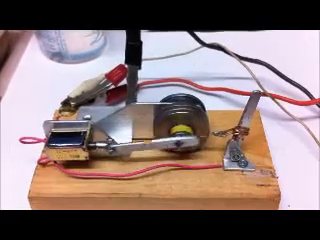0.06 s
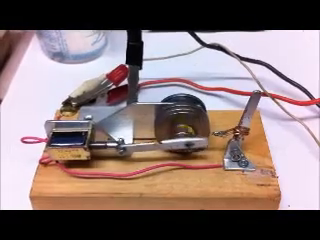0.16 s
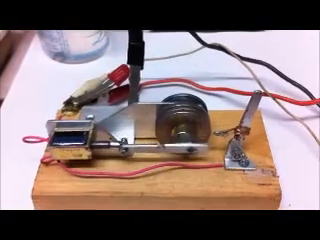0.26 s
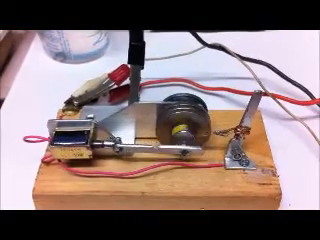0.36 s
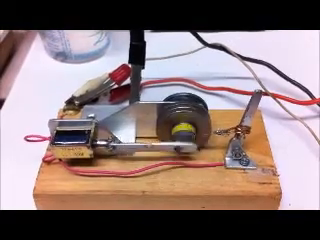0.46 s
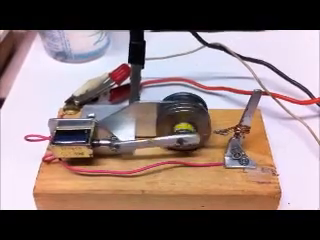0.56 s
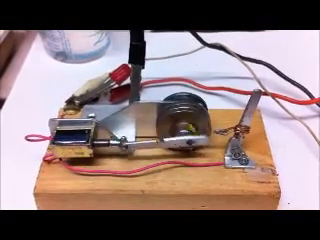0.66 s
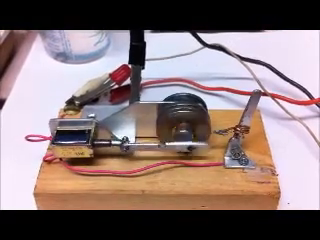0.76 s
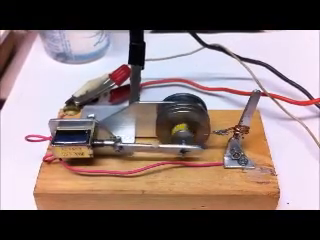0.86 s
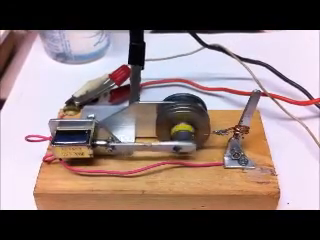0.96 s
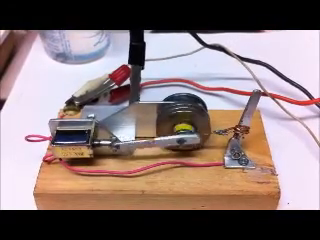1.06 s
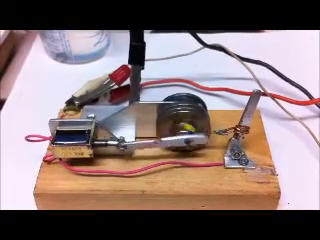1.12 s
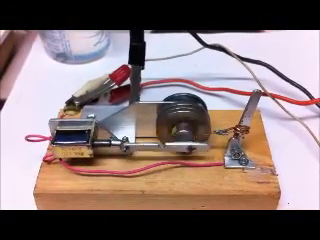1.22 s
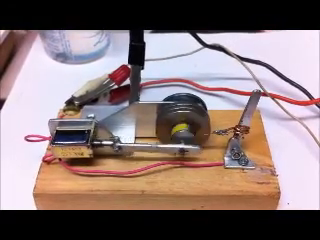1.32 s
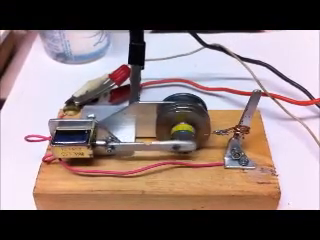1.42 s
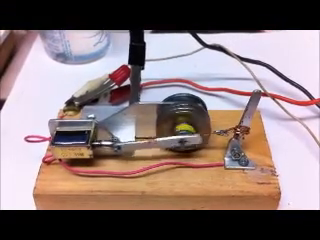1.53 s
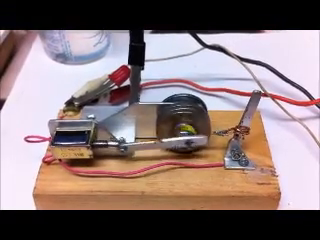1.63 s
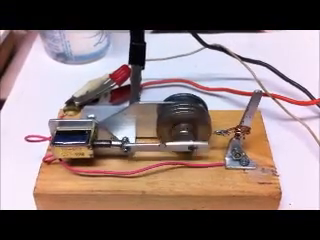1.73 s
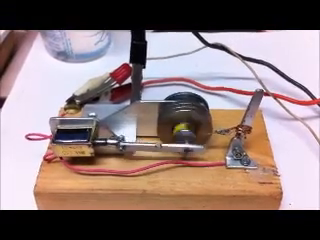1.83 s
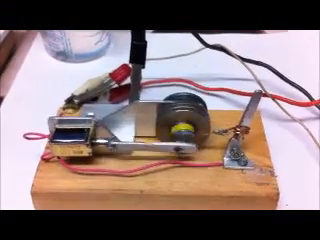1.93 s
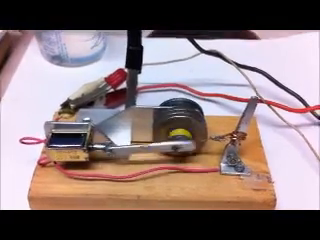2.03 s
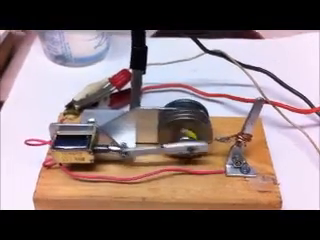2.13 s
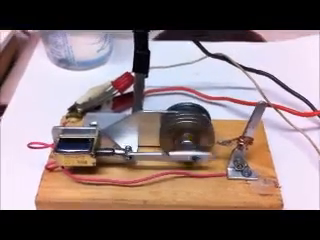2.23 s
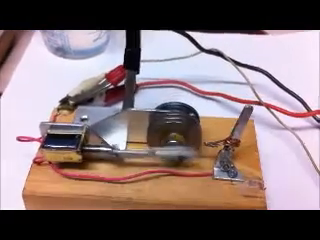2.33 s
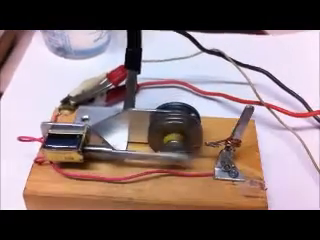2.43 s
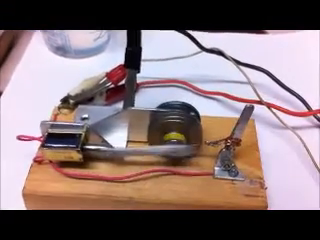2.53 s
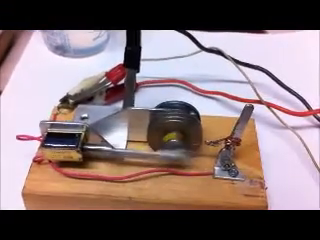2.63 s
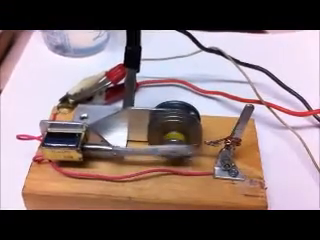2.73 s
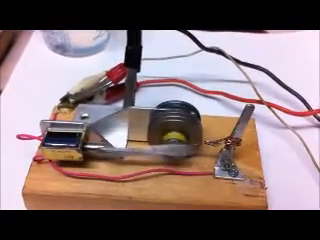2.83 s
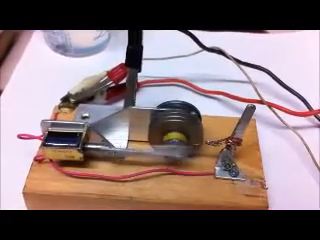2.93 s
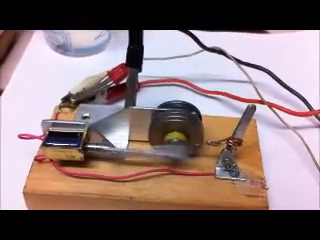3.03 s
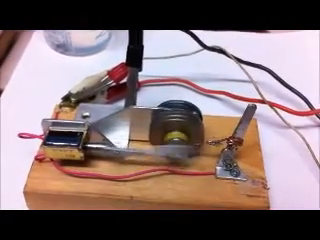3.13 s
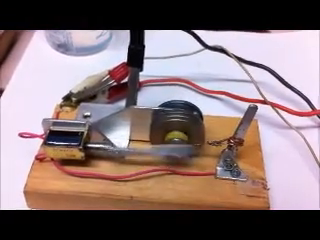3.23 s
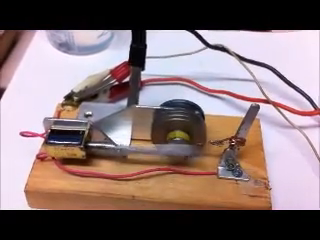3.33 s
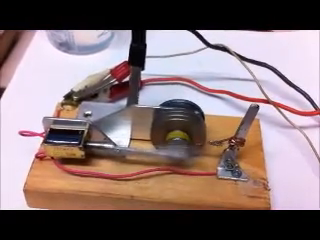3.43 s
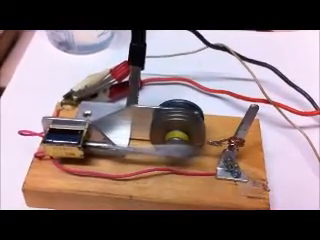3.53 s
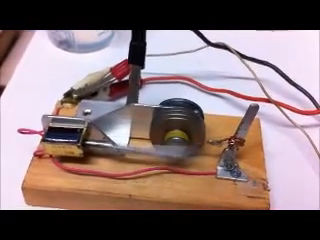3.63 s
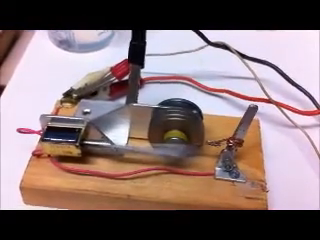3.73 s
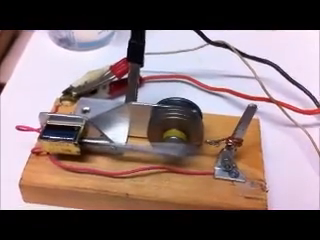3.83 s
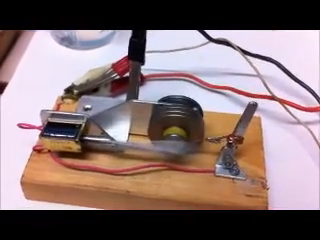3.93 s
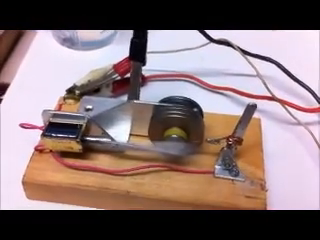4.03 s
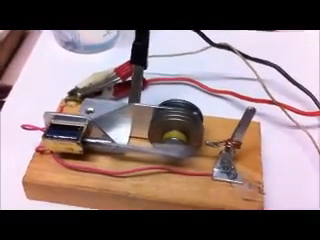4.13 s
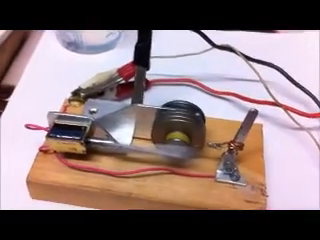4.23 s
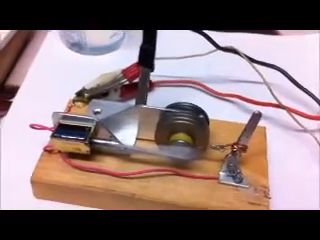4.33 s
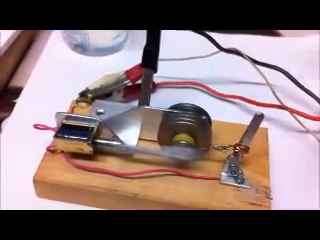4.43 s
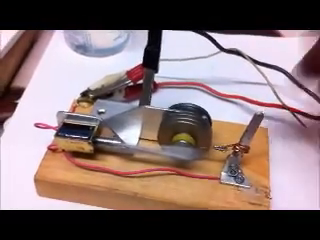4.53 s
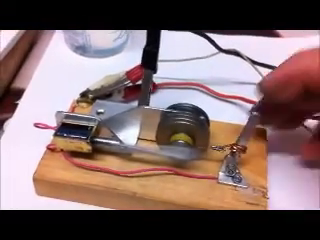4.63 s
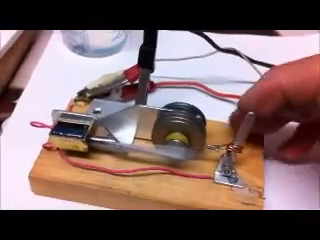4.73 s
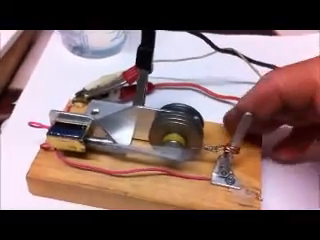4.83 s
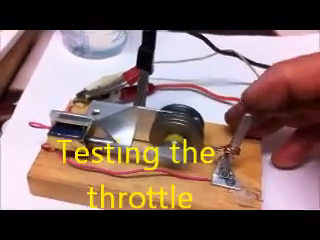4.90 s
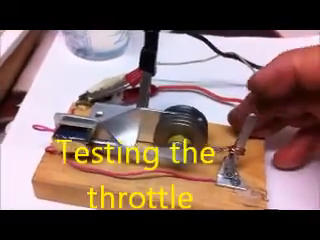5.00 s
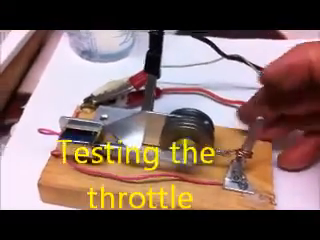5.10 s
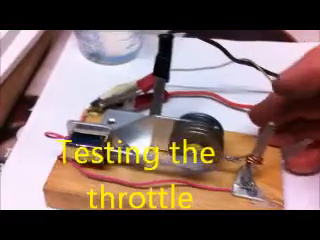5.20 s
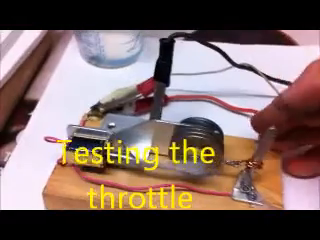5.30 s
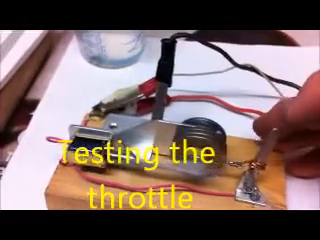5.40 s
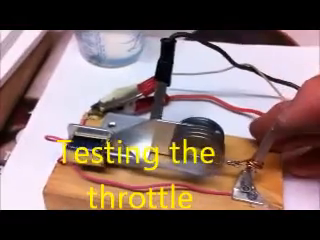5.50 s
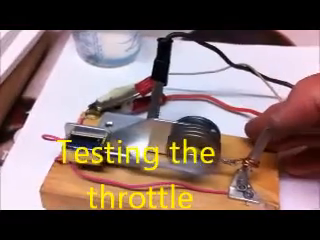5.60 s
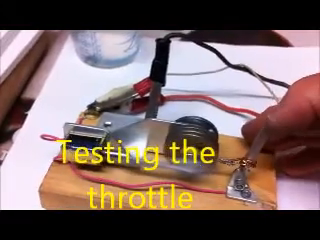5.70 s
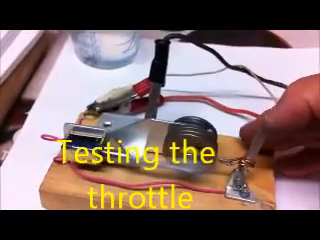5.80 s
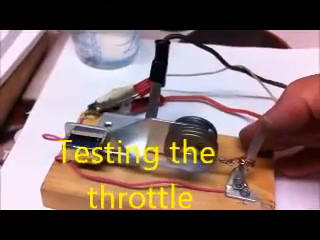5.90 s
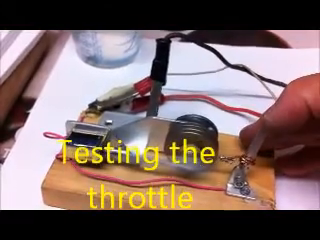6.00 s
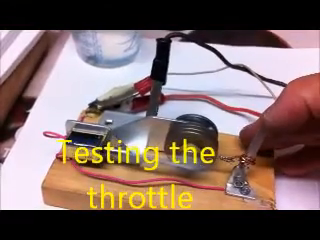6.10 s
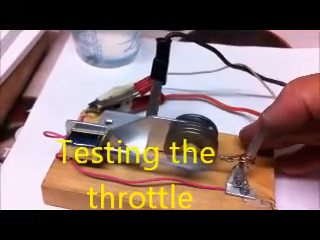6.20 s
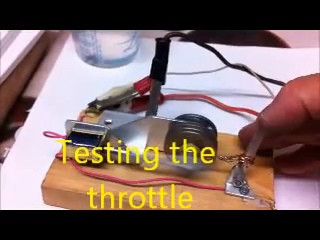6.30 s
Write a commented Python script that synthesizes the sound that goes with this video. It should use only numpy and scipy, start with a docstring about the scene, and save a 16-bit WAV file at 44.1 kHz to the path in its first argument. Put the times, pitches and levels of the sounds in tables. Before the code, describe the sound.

A small solenoid engine runs on a wooden board in a quiet room with faint hiss. For the first 2.3 seconds it sounds as if in slow motion: five sharp, high steel clacks half a second apart, each preceded by a light switch tick, with faint, thin squeaks from rubbing parts. A few soft, dull bumps come close to the microphone around 2.1 to 2.2 seconds. At 2.5 seconds the engine abruptly runs louder and faster, climbing from about twelve clacks a second to about thirty by 4 seconds. A faint high squeal fades by 3 seconds, and the switch ticks end soon after. Two more dull thumps land just before 4 seconds. The bright clatter, uneven in strength, carries on at a steady pace until the end at about 6.4 seconds, over rattling linkage, a friction rustle and a soft, low flywheel hum.

```python
"""A small solenoid engine

A solenoid engine on a wooden base board clacks about twice a second as if in slow motion, then runs at full
pace and speeds up to about 31 clacks a second. Each time the plunger strikes and bounces and the linkage
rattles, exciting the modes of frame and board. Friction adds a rustle and two stick-slip squeals, the flywheel
makes the board hum, the cam switch ticks at first, and a few dull bumps sound close to the microphone."""
import sys
import numpy as np
from scipy import signal
from scipy.fft import rfft, irfft, next_fast_len
from scipy.io import wavfile
from scipy.ndimage import uniform_filter1d

SR = 44100
rng = np.random.default_rng(int(sys.argv[2]) if len(sys.argv) > 2 else 0)


def to_wav(s):
    """Save 16-bit WAV."""
    ch = np.atleast_2d(s).T  # columns
    pcm = np.round(np.clip(ch, -1, 1) * 32767)  # PCM
    wavfile.write(sys.argv[1], SR, pcm.astype(np.int16))


N = 280035
T = np.arange(N) / SR


def amp(db):
    """Amplitude ratio of a level in dB."""
    return 10 ** (np.asarray(db) / 20)


def rms_one(x):
    """Normalisation to rms 1."""
    return x / np.sqrt(np.mean(x ** 2) + 1e-20)


def place(times, shapes):
    """Superposition: each row of shapes starts at its time."""
    out = np.zeros(N + shapes.shape[1])
    starts = np.round(np.clip(times, 0, T[-1]) * SR).astype(int)
    np.add.at(out, starts[:, None] + np.arange(shapes.shape[1]), shapes)
    return out[:N]


def swell(rise_s, fall_s):
    """Exponential growth and decay: an 80 ms envelope of peak 1, and the time of its peak."""
    t = T[:SR * 8 // 100] - 0.02
    shape = np.exp(-np.logaddexp(-t / rise_s, t / fall_s))
    return shape / shape.max(), T[shape.argmax()]


def bursts(times, db, rise_s, fall_s):
    """Transient envelopes that peak at the given times."""
    shape, peak_s = swell(rise_s, fall_s)
    return place(times - peak_s, amp(db)[:, None] * shape)


def pings(times, db, hz, rise_s, fall_s):
    """Damped sinusoids of random phase that peak at the given times."""
    shape, peak_s = swell(rise_s, fall_s)
    phase = rng.uniform(0, 2 * np.pi, (len(times), 1))
    tone = np.sin(2 * np.pi * np.outer(hz, T[:len(shape)]) + phase)
    return place(times - peak_s, amp(db)[:, None] * shape * tone)


def grains(per_s, spread_db):
    """Shot noise: random small contacts of uneven size; rms 1."""
    sizes = amp(spread_db * np.minimum(rng.exponential(1, N), 4)) * rng.choice([-1, 1], N)
    return rms_one(sizes * (rng.random(N) < per_s / SR))


def drift(corner_hz):
    """Slow random fluctuation: low-passed noise; rms 1."""
    r = np.exp(-2 * np.pi * corner_hz / SR)
    return rms_one(signal.lfilter([1], [1, -2 * r, r * r], rng.standard_normal(N + SR))[SR:])


def coloured_noise(spectrum):
    """Spectral shaping of white noise by (f/Hz, level/dB) points; rms 1."""
    hz, db = np.transpose(spectrum)
    size = next_fast_len(N)
    bins = np.maximum(np.fft.rfftfreq(size, 1 / SR), 1)
    gain = amp(np.interp(np.log(bins), np.log(hz), db))
    return rms_one(irfft(rfft(rng.standard_normal(N), size) * gain, size)[:N])


def band(x, low_hz, high_hz, order):
    """Butterworth band-pass; rms 1."""
    sos = signal.butter(order, [low_hz, high_hz], "band", fs=SR, output="sos")
    return rms_one(signal.sosfilt(sos, x))


def resonance(x, hz, width_hz):
    """Two equal two-pole resonators in cascade; rms 1."""
    r = np.exp(-np.pi * width_hz / SR)
    section = [1, 0, -1, 1, -2 * r * np.cos(2 * np.pi * hz / SR), r * r]
    return rms_one(signal.sosfilt([section, section], x))


def body(force, modes):
    """Modal superposition: a force drives damped modes of alternating sign."""
    out = 0
    for k, (hz, db, t60) in enumerate(modes):
        r, w = amp(-60 / (t60 * SR)), 2 * np.pi * hz / SR
        mode = signal.lfilter([0, np.sin(w)], [1, -2 * r * np.cos(w), r * r], force + 1e-18)
        out = out + (-1) ** k * amp(db) * mode
    return out


def shaken(envelope, contacts, modes):
    """Random excitation of modes; an envelope of 1 gives rms 1."""
    return body(envelope * contacts, modes) / np.std(body(contacts, modes))


def steel(contacts):
    """The plunger's broad, heavily damped treble resonance; rms 1."""
    return band(resonance(contacts, 9200, width_hz=8700), 6520, 9950, order=4)


def high_sizzle(noise):
    """Narrow-band noise: a thin, high sizzle near 11.8 kHz; rms 1."""
    return resonance(noise, 11770, width_hz=810)


# Room noise spectrum: f/Hz, relative density level/dB
ROOM_SPECTRUM = [(41, -48), (70, -11), (194, -5.5), (387, -12), (1620, -13.5), (2050, -12), (2340, -5),
                 (2780, -19), (5330, -17), (6760, -13), (12400, -22), (16100, -54), (22000, -120)]


def room():
    """Ambient noise: a faint, stationary hiss."""
    return amp(-66) * coloured_noise(ROOM_SPECTRUM)


# Bumps near the microphone: t/s, level/dB, f/Hz
BUMPS = [(2.101, -33.5, 203), (2.146, -59, 164), (2.173, -48, 174), (2.214, -39, 292.6),
         (2.221, -32, 258.6), (3.876, -24.5, 247.5), (3.976, -31.5, 344)]


def bumps():
    """Heavily damped oscillation: thuds of a cycle or two, with a higher partial as their edge."""
    times, db, hz = np.transpose(BUMPS)
    thuds = pings(times + 0.0035, db, hz, 0.00023, 0.0019)
    edges = pings(times + 0.00163, db - 1, 3.5 * hz, 0.00016, 0.00037)
    return signal.sosfilt(signal.butter(2, 110, "high", fs=SR, output="sos"), thuds + edges)


# Squeaks of the rubbing parts, at a low and a high pitch: t/s, duration/s, level/dB, f/Hz
LOW_SQUEAKS = [(0.04, 0.092, -58, 2323), (0.24, 0.082, -54, 2355), (0.54, 0.042, -58, 2300),
               (0.735, 0.08, -57, 2335), (1.035, 0.051, -62, 2334), (1.24, 0.052, -58, 2390),
               (1.32, 0.052, -54.5, 2320), (1.53, 0.078, -59.5, 2313), (1.8, 0.047, -59.5, 2336),
               (2.05, 0.03, -53.5, 2310), (2.22, 0.053, -62, 2330), (2.31, 0.03, -57, 2306)]
HIGH_SQUEAKS = [(0.0, 0.013, -54, 6800), (0.225, 0.03, -57, 6570), (0.3, 0.068, -57, 6690),
                (0.505, 0.018, -55, 6750), (0.73, 0.04, -59, 6680), (0.81, 0.014, -57.5, 6680),
                (0.855, 0.017, -59, 6780), (1.0, 0.011, -52.5, 6760), (1.225, 0.03, -59, 6550),
                (1.3, 0.08, -60, 6740), (1.47, 0.045, -64.5, 6670), (1.7, 0.06, -59.5, 6700),
                (1.79, 0.016, -61.5, 6730), (1.85, 0.022, -65, 6750), (2.2, 0.05, -61, 6700),
                (2.49, 0.24, -54.5, 6880), (2.8, 0.63, -57, 6660)]


def squeal(squeaks, between_db, until_s, width_hz, flicker_db):
    """Stick-slip oscillation: a faint narrow-band tone swells into squeaks and is gone by until_s."""
    times, length_s, db, hz = np.transpose(squeaks)
    level = np.full(N, amp(between_db))
    for start, stop, peak in zip(times, times + length_s, amp(db)):
        level[round(start * SR):round(stop * SR)] = peak
    level = uniform_filter1d(level, size=400) * amp(flicker_db * drift(17.5))
    r = np.exp(-np.pi * width_hz / SR)
    in_phase, quadrature = signal.lfilter([1], [1, -2 * r, r * r], rng.standard_normal((2, N)))
    phase = 2 * np.pi * np.cumsum(np.interp(T, times + length_s / 2, hz)) / SR
    fade = np.clip((until_s - T) / 0.089, 0, 1)
    return fade * level * rms_one(in_phase * np.cos(phase) + quadrature * np.sin(phase))


def flywheel_hum(level_db):
    """Forced vibration: at full pace the flywheel pushes the board's lowest mode once a turn."""
    clacks = np.transpose(STROKES)[0]
    even_times = uniform_filter1d(clacks, size=5, mode="nearest")[9:]  # inertia evens out the turns
    push = place(even_times + 0.0011, np.ones((len(even_times), 1))) + amp(-38) * rng.standard_normal(N)
    return amp(level_db) * resonance(push, 207.8, width_hz=51)


# Modes of the frame and of the base board: f/Hz, level/dB, T60/s
FRAME_MODES = [(2034, 4, 0.0064), (2148, 0.5, 0.019), (2308, -3.5, 0.019), (2545, -4.5, 0.023),
               (2840, 0, 0.0078), (3460, 1.5, 0.0059), (4170, 0.5, 0.0071), (4750, 0.5, 0.0055),
               (5560, -1, 0.0044)]
BOARD_MODES = [(370, -4, 0.024), (502, -4, 0.023), (654, -2, 0.026), (787, 4.5, 0.015), (976, 5, 0.011),
               (1126, -2, 0.023), (1386, 4, 0.0089)]
# Rumble spectrum of the board: f/Hz, relative density level/dB
RUMBLE_SPECTRUM = [(12, -50), (20, 4), (123, -10), (208, -12), (276, -1), (352, -4), (500, -13),
                   (650, -70), (1100, -120)]
# Base levels that swell and fade: t/s, frame friction/dB, board friction/dB, hum/dB, high sizzle/dB
RUNNING_LEVELS = [(0.0, -72, -79.5, -87, -77), (2.0, -74, -79, -85, -79), (2.3, -65.5, -72.5, -83, -76),
                  (2.475, -64.5, -71, -68, -68), (2.5, -58.5, -53, -66, -59), (2.6, -50.5, -54.5, -56, -65),
                  (2.999, -46.5, -49, -64, -61), (3.33, -44, -46.5, -55, -62),
                  (3.6, -45.5, -46, -60, -57.5), (3.95, -44.5, -48, -56.5, -60.5),
                  (4.45, -38, -43.5, -50, -65.5), (4.6, -38, -44.5, -51, -60),
                  (5.2, -39.5, -45, -49.5, -67), (5.5, -40.5, -46.5, -51, -67),
                  (5.75, -42.5, -49, -46.5, -66), (6.05, -41.5, -42.5, -48, -72.5),
                  (6.35, -42, -48.5, -48.5, -72)]


def running_noise():
    """Frictional excitation: rubbing shakes board, frame and plunger; a hum and a thin sizzle join in."""
    times, *columns = np.transpose(RUNNING_LEVELS)
    rub_db, board_db, hum_db, sizzle_db = [np.interp(T, times, column) for column in columns]
    # each slow-motion clack stirs the rubbing parts, which then calm down
    opening = np.transpose(STROKES)[0][:len(OPENING_TICKS)]
    since_s = np.where(T < opening[0], 1, T - opening[np.searchsorted(opening, T) - 1])
    stir_db, calm_db_per_s = np.c_[[13.1, 4, 7, 25]], np.c_[[89.5, 60.4, 40, 150]]
    stir = np.maximum(stir_db - calm_db_per_s * since_s, 0)
    board_stir, frame_stir, steel_stir, hum_stir = uniform_filter1d(stir, size=900)
    board_db = board_db + board_stir + 1.74 * drift(3.5)
    frame_db = rub_db + frame_stir + 1.8 * drift(10.4)
    steel_db = -45.5 + 1.17 * (rub_db + 43) + steel_stir + 1.4 * drift(9.0)
    hum_db = hum_db + hum_stir + 2.4 * drift(8.1)
    turns = np.interp(T, np.transpose(STROKES)[0], np.arange(len(STROKES)))
    load = np.cos(2 * np.pi * (turns + 0.019))  # highest near the clack
    board = rms_one(body(grains(2000, 4.46), BOARD_MODES)) + amp(-10) * coloured_noise(RUMBLE_SPECTRUM)
    frame = band(body(grains(3000, 4.3), FRAME_MODES), 900, 4630, order=2)
    rub = grains(4100, 5.5)
    treble = amp(steel_db) * steel(rub) + amp(sizzle_db) * high_sizzle(rub)
    rustle = amp(board_db + 2 * load) * board + amp(frame_db + 2.4 * load) * frame + treble
    return rustle + flywheel_hum(hum_db)


def plunger_pull(times, tick_db, ring_db):
    """Magnetic pull: from tick to clack the plunger sizzles and rings in its tube and shakes the board."""
    ring_hz, ring_t60_s = 2312, 0.044
    clacks = np.transpose(STROKES)[0]
    sizzle_level, ring_level = np.zeros((2, N))
    for start, tick, ring in zip(times, tick_db, ring_db):
        stop = clacks[clacks > start][0] + 0.012
        pull = slice(round(start * SR), round(stop * SR))
        sizzle_level[pull], ring_level[pull] = amp(tick - 24.5), amp(ring)
    sizzle = uniform_filter1d(sizzle_level, size=150) * band(grains(8400, 4.4), 6180, 7270, order=3)
    tone = resonance(rng.standard_normal(N), ring_hz, width_hz=99)
    ringing = uniform_filter1d(ring_level, size=150) * tone
    jolt = place(times + 0.00209, amp(ring_db + 4.5)[:, None])
    ping = body(jolt, [(ring_hz, 0, ring_t60_s)])
    shake = shaken(amp(-5.5) * uniform_filter1d(ring_level, size=300), grains(2000, 4.6), BOARD_MODES)
    return sizzle + ringing + ping + shake


# Modes of the cam switch: f/Hz, level/dB, T60/s
SWITCH_MODES = [(1710, -7, 0.0097), (6380, -1, 0.033), (7230, 4, 0.011)]
# Ticks of the switch in the slow-motion opening: t/s, level/dB
OPENING_TICKS = [(0.0348, -39.5), (0.537, -39.5), (1.0366, -39.5), (1.5284, -40), (2.0236, -41)]


def cam_switch():
    """Contact bounce: ahead of the clack the switch shuts in tiny touches and starts the plunger's pull."""
    lead_turns, until_s = 0.34, 3.6
    clacks = np.transpose(STROKES)[0]
    opening_times, opening_db = np.transpose(OPENING_TICKS)
    fast_times = (clacks[:-1] - lead_turns * np.diff(clacks))[len(opening_times):]
    fast_times = fast_times[fast_times < until_s]
    times = np.append(opening_times, fast_times)
    tick_db = np.append(opening_db, -38.5 + 2.6 * rng.standard_normal(len(fast_times)))
    ring_db = np.append(np.full(len(opening_times), -70.5), -46.5 - 4 * (fast_times - fast_times[0]))
    touches = rng.standard_normal((len(times), 90)) * np.exp(-T[:90] / 0.00052)
    ticks = body(place(times + 0.000946, amp(tick_db - 11.5)[:, None] * touches), SWITCH_MODES)
    pull = plunger_pull(times, tick_db, ring_db)
    spit = bursts(times + 0.0018, tick_db - 5.5, 0.00033, 0.0035)
    return ticks + pull + spit * band(grains(14000, 1.5), 8200, 15400, order=2)


def linkage():
    """Backlash: play in the joints is taken up at each clack, in bursts of contact on frame and board."""
    times, clack_db, _, play_db = np.transpose(STROKES)
    knock_db = play_db - 4.5 + 2.5 * rng.standard_normal(len(times))
    rattle = shaken(bursts(times - 0.002, play_db, 0.0023, 0.0034), grains(2500, 2.4), FRAME_MODES)
    apart = np.gradient(times) > 0.2  # under five clacks a second
    knock = shaken(bursts(times[~apart], knock_db[~apart], 0.002, 0.0056), grains(3000, 1.56), BOARD_MODES)
    # widely spaced clacks sound one board mode, and the rod settles audibly afterwards
    wood_db, settle_times = np.full(apart.sum(), -48), times[apart] + 0.026
    wood = bursts(times[apart] + 0.0017, wood_db, 0.00095, 0.0042)
    wood += bursts(settle_times, wood_db - 17, 0.0047, 0.017)
    wood *= resonance(grains(5000, 1.8), 647, width_hz=230)
    settle = bursts(settle_times, clack_db[apart] - 33, 0.0015, 0.0039)
    settle *= band(grains(4900, 0.99), 1000, 10000, order=1)
    return rattle + knock + wood + settle


# Plunger strokes, one a turn: t/s, clack level/dB, clack f/Hz, level of the play in the joints/dB
STROKES = [(0.2259, -21.5, 9150, -52), (0.7292, -23, 9170, -56), (1.2257, -21, 9200, -58),
           (1.7128, -23.5, 9200, -54), (2.2163, -23.5, 9240, -54), (2.5427, -11.5, 9090, -40.5),
           (2.6232, -13, 9050, -42.2), (2.6992, -11.7, 9050, -39), (2.7701, -13.5, 9090, -39),
           (2.8368, -13.5, 9090, -39.5), (2.9012, -12.5, 8990, -43.5), (2.9625, -12.4, 9060, -49),
           (3.0209, -9.5, 9180, -34.5), (3.0771, -10, 8730, -34), (3.1313, -3.5, 8900, -39),
           (3.1842, -11, 8990, -33.5), (3.2358, -5.0, 8620, -35.0), (3.2854, -8, 8980, -36.7),
           (3.334, -3, 8850, -27.5), (3.3834, -7.5, 8780, -32.5), (3.4303, -6.5, 8600, -34),
           (3.4777, -4.5, 8600, -34.5), (3.524, -6.5, 8800, -44), (3.5695, -7, 8410, -31.5),
           (3.6125, -3.5, 8550, -32.5), (3.655, -9, 8420, -36.0), (3.6975, -8.5, 8300, -33.5),
           (3.7382, -7.5, 8340, -35.5), (3.7778, -6.5, 8600, -35.5), (3.8164, -7.5, 8350, -36.5),
           (3.8568, -11.5, 8670, -33.5), (3.8919, -7, 8630, -37.6), (3.928, -6.5, 8360, -31),
           (3.9629, -13.5, 8810, -38.5), (3.9976, -11, 8780, -38), (4.0322, -18, 8970, -36),
           (4.0652, -7.5, 8770, -35), (4.0974, -4, 8720, -37), (4.1292, -7.5, 8600, -35.5),
           (4.1636, -15.5, 8920, -30), (4.1942, -7.5, 8890, -34.5), (4.225, -21, 9100, -36),
           (4.261, -10, 8840, -30), (4.2894, -7.5, 8680, -34.5), (4.3202, -26, 8710, -33),
           (4.3542, -18.5, 9310, -34.5), (4.387, -7.5, 8590, -32.1), (4.4168, -4, 9020, -34.5),
           (4.4509, -8.5, 9080, -30.3), (4.4823, -16.5, 9050, -35), (4.5153, -22, 9150, -29.5),
           (4.5462, -4.5, 8630, -33.5), (4.5783, -33, 9040, -33), (4.6103, -10, 8360, -30),
           (4.6407, -10.5, 8960, -32.5), (4.6726, -13.5, 9190, -39), (4.706, -36, 9130, -33),
           (4.738, -15.5, 9120, -32.9), (4.7685, -5.5, 9160, -29.5), (4.8004, -16, 9130, -32.2),
           (4.8332, -20.5, 9190, -43), (4.8666, -14.5, 9160, -33), (4.8967, -23.6, 8640, -30.6),
           (4.9278, -20, 9130, -31), (4.962, -14, 9240, -36), (4.995, -25.9, 8940, -41),
           (5.028, -19, 9280, -31), (5.0602, -8.5, 8870, -33), (5.0918, -4.5, 8790, -36.5),
           (5.1234, -14, 9120, -34.5), (5.1575, -14.5, 9250, -35), (5.189, -21.5, 9180, -32),
           (5.2218, -26, 9200, -37.5), (5.254, -10, 8300, -30.5), (5.286, -19, 9080, -34.4),
           (5.3177, -9, 8990, -40), (5.3513, -3.5, 8600, -30), (5.383, -4.2, 8700, -35.5),
           (5.417, -33, 8950, -51), (5.4474, -4.5, 8760, -33), (5.482, -19, 9080, -36.5),
           (5.5115, -8, 8600, -34), (5.5473, -14.5, 8960, -33), (5.5792, -6, 8650, -32),
           (5.6094, -7, 8820, -35), (5.643, -12.2, 8790, -36.5), (5.675, -8.5, 8880, -44),
           (5.7076, -3, 8630, -35.5), (5.7408, -16, 9080, -33.5), (5.774, -23, 8990, -35.4),
           (5.8055, -11.5, 9090, -59), (5.8404, -14.5, 9090, -33.5), (5.87, -25.8, 8910, -33),
           (5.904, -19.5, 8730, -33), (5.937, -19, 8780, -35), (5.9741, -3.5, 8570, -32.5),
           (6.0074, -4, 8440, -31), (6.0415, -3, 8450, -31.5), (6.0726, -11, 8760, -34),
           (6.1086, -27, 9040, -33), (6.1416, -17.5, 9080, -36.4), (6.1744, -26, 8960, -33),
           (6.2082, -4.5, 8750, -33.0), (6.242, -20, 9010, -32), (6.2747, -20, 9160, -35.5),
           (6.3076, -6.5, 9010, -35), (6.3422, -15.5, 9080, -34)]


def plunger():
    """Impact and rebound: each rings the steel for about a millisecond, with chatter dying away behind."""
    times, clack_db, hz, _ = np.transpose(STROKES)
    snap_luck, pitch_luck, crack_luck, delay_luck, bounce_luck = rng.uniform(-1.01, 1, (len(times), 5)).T
    clack = pings(times, clack_db, hz, 0.00013, 0.000315)
    delay_s = 0.0014 - 0.00073 * np.log(np.clip((delay_luck + 1) / 2, 0.02, 1))
    bounce_db = np.minimum(-17 + 0.65 * clack_db + 10 * bounce_luck, clack_db)
    bounce = pings(times + delay_s, bounce_db, hz, 0.00016, 0.0006)
    level_times, *_, base_sizzle_db = np.transpose(RUNNING_LEVELS)
    sizzle_db = np.interp(times, level_times, base_sizzle_db) + 39.5 + 1.15 * clack_db
    sizzle = bursts(times, sizzle_db, 0.0014, 0.0027) * high_sizzle(grains(9000, 3.1))
    snap_hz = 5520 * (1 + pitch_luck / 20)
    snap = pings(times + 0.00044, clack_db - 18.5 + 3 * snap_luck, snap_hz, 0.000063, 0.00041)
    crack = body(place(times, amp(clack_db - 28.5 + 6 * crack_luck)[:, None]), FRAME_MODES)
    early = bursts(times + 0.00071, clack_db - 24.5, 0.00098, 0.0014)
    late = bursts(times + 0.004, clack_db - 33.5, 0.0031, 0.015)
    chatter = (early + late) * steel(grains(6000, 4.3))
    return clack + bounce + sizzle + snap + crack + chatter


def bench_dip(x, hz=1644, width_hz=220, depth=0.33):
    """Destructive interference: the bench top cancels part of the engine's sound in one band."""
    return x - depth * signal.lfilter(*signal.iirpeak(hz, hz / width_hz, fs=SR), x)


def scene():
    """Superposition of all sources in one channel."""
    hiss = room()
    low_squeal = squeal(LOW_SQUEAKS, between_db=-65.5, until_s=2.4, width_hz=79, flicker_db=0.5)
    high_squeal = squeal(HIGH_SQUEAKS, between_db=-72, until_s=3.1, width_hz=156, flicker_db=2.5)
    engine = bench_dip(plunger() + linkage() + running_noise()) + cam_switch()
    return (hiss + bumps() + low_squeal + high_squeal + engine)[None]


def record(dry):
    """Band limiting: the microphone thins the deep bass, and the top is cut steeply."""
    thinned = signal.sosfilt(signal.butter(1, 90, "high", fs=SR, output="sos"), dry)
    return signal.sosfilt(signal.cheby2(14, 45, 12450, fs=SR, output="sos"), thinned)


dry = scene()
out = record(dry)
to_wav(out)
```